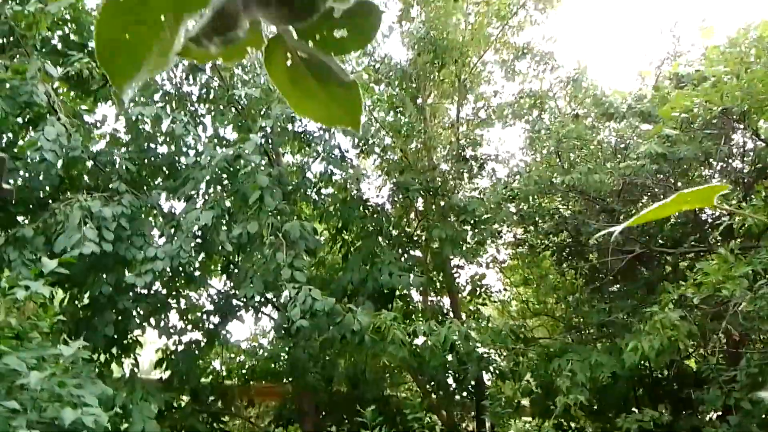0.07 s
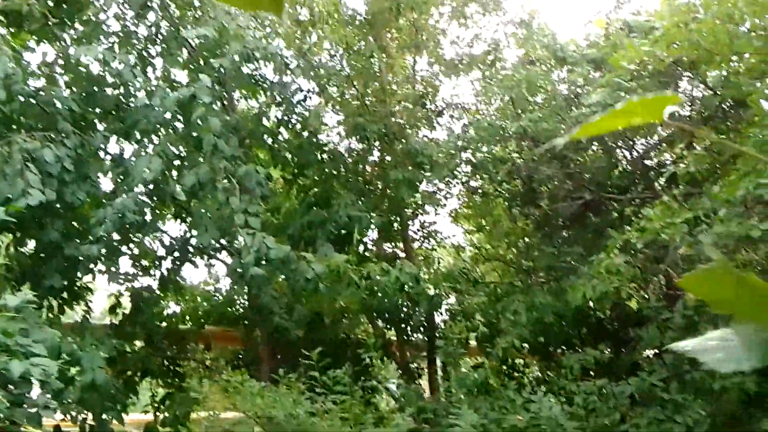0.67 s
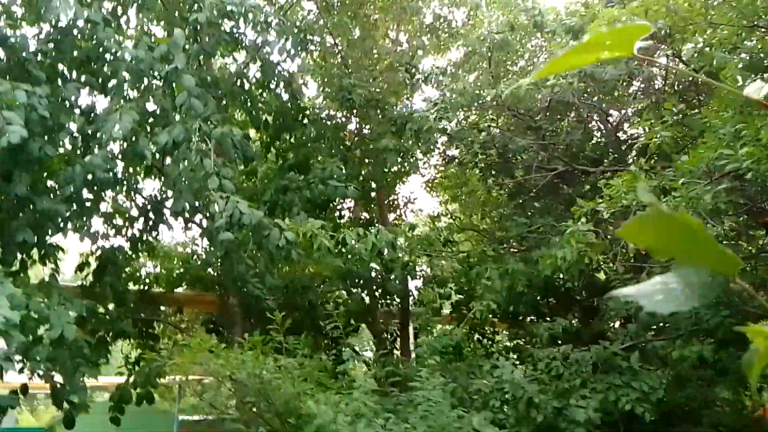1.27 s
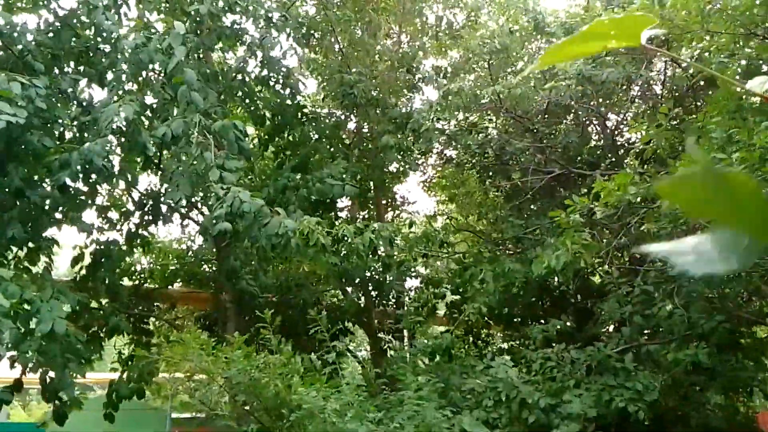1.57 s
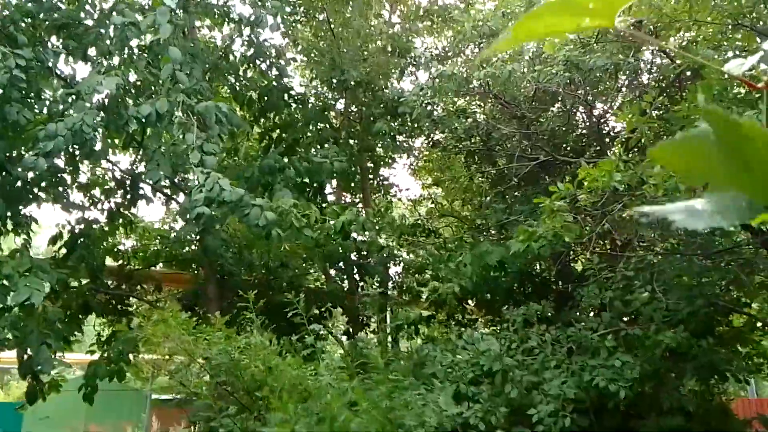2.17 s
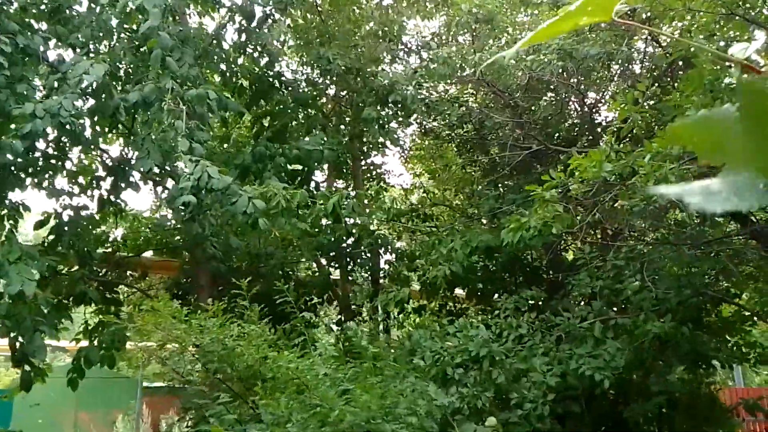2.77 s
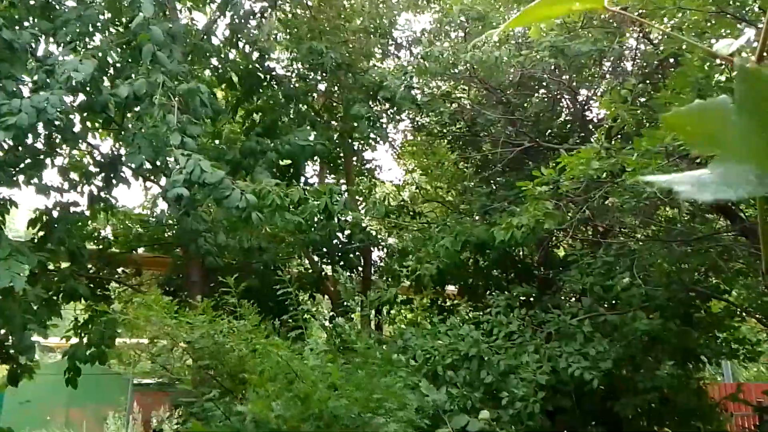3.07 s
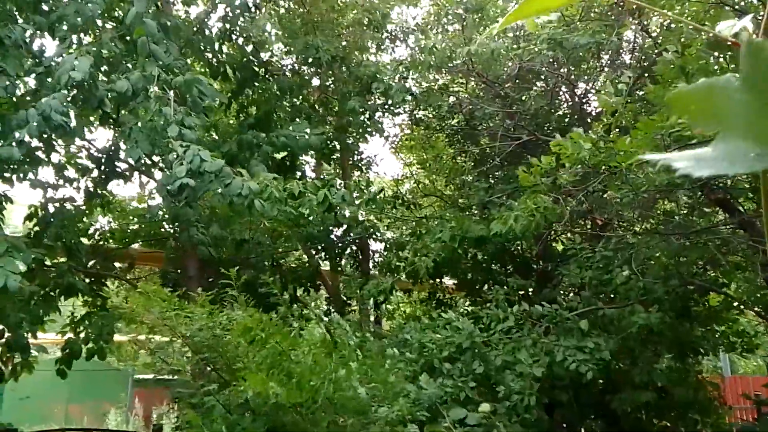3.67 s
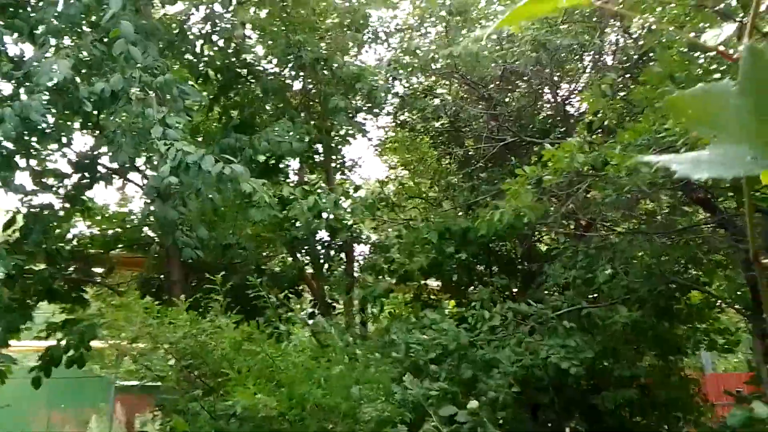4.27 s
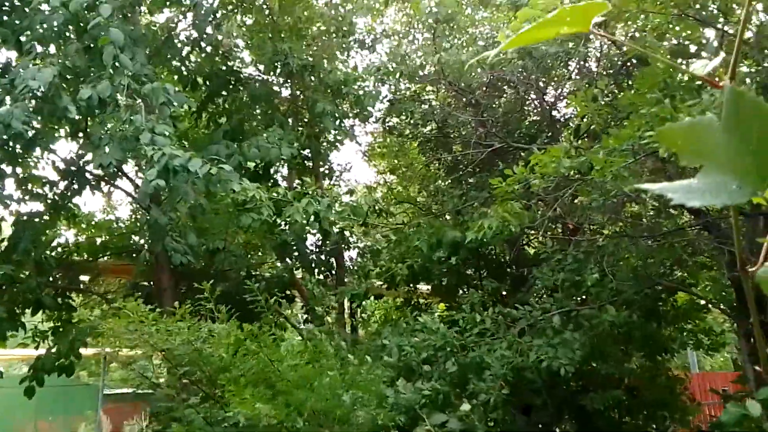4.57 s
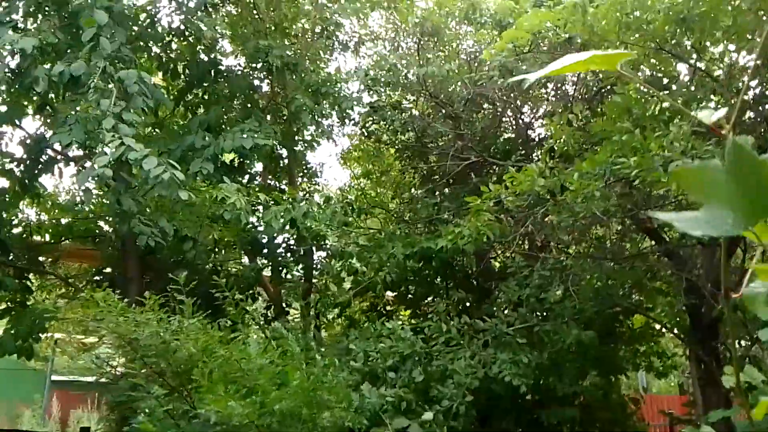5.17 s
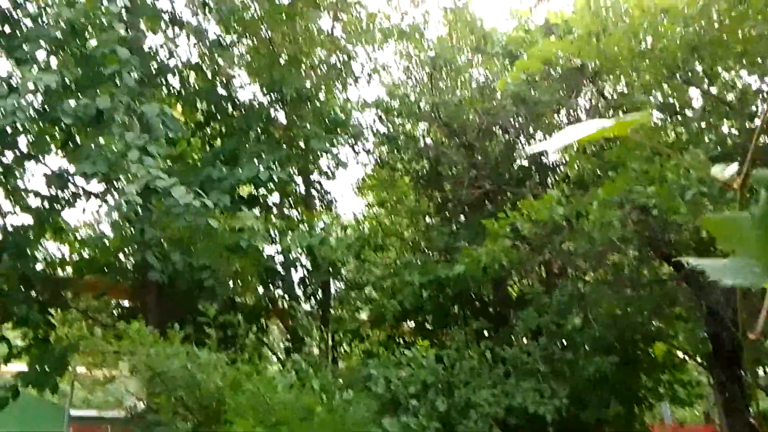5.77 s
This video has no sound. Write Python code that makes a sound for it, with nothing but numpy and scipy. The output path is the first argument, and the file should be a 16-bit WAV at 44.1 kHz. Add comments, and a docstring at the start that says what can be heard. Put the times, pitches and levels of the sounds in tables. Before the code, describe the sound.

Wind strikes the microphone almost at once in a garden, with low fluttering thumps and a rush that whistles very thinly at its height, while twigs tick lightly nearby. After about a second the buffeting fades. What remains is a faint, even hiss of leaves in trees and shrubs above a distant drone, with a far engine swelling twice, two slight puffs of wind and a faint deep rumble in the second half.

```python
"""A garden in a light breeze, heard from one microphone: far treetops and near leaves hiss over a faint
distant drone, and a twig taps close by now and then. Early on one gust reaches the microphone: eddies
thump on its port, and the flow rushes and whistles thinly at its height. It dies away and leaves the
steady hiss, with a far-off engine, two faint puffs of wind and a deep rumble that sets in past midway."""
import sys
import numpy as np
from scipy import signal
from scipy.fft import rfft, irfft, next_fast_len
from scipy.io import wavfile
from scipy.ndimage import uniform_filter1d

SR = 44100
rng = np.random.default_rng(int(sys.argv[2]) if len(sys.argv) > 2 else 0)


def store_pcm(level_fs):
    """Save levels as 16-bit WAV."""
    pcm = np.round(np.clip(level_fs, -1, 1) * 32767).astype(np.int16)
    wavfile.write(sys.argv[1], SR, np.atleast_2d(pcm).T)


N = 261513
TIME_S = np.arange(N) / SR


def from_db(db):
    """Decibels to gain."""
    return 10 ** (np.asarray(db) / 20)


def rms_one(x):
    """Scale to an rms of 1."""
    return x / np.sqrt(np.mean(x ** 2) + 1e-20)


def in_time(rows):
    """Each column of a curve at every sample."""
    time_s, *columns = np.transpose(rows)
    return [np.interp(TIME_S, time_s, column) for column in columns]


def swell(peak_s, half_width_s):
    """A smooth rise and fall of height 1."""
    return np.exp(-((TIME_S - peak_s) / half_width_s) ** 2)


def drift(rate_hz):
    """A slow random wander of spread 1, mostly below rate_hz."""
    step, settle = 40, 2000
    pole = np.exp(-2 * np.pi * rate_hz * step / SR)
    noise = rng.standard_normal(N // step + settle + 2)
    slow = signal.lfilter([1], [1, -2 * pole, pole * pole], noise)[settle:]
    return np.interp(np.arange(N) / step, np.arange(len(slow)), rms_one(slow))


def coloured(x, spectrum):
    """Shape a sound by rows of frequency_hz, relative_db; rms 1."""
    size = next_fast_len(N)
    hz, db = np.transpose(spectrum)
    bins_hz = np.maximum(np.arange(size // 2 + 1) * SR / size, 1)
    gain = from_db(np.interp(np.log(bins_hz), np.log(hz), db))
    return rms_one(irfft(rfft(x, size) * gain, size)[:N])


def resonate(x, hz, width_hz):
    """One resonance with gain 1 at its peak."""
    r = np.exp(-np.pi * width_hz / SR)
    feedback = [1, -2 * r * np.cos(2 * np.pi * hz / SR), r * r]
    return signal.lfilter(np.array([1, 0, -1]) * (1 - r * r) / 2, feedback, x)


def add(out, start_s, sound):
    """Mix a short sound in at start_s."""
    at = max(int(start_s * SR), 0)
    out[at:at + len(sound)] += sound[:N - at]


def turbulence(spectrum, even_s):
    """Flow noise whose rms is held near 1 over spans of even_s."""
    flow = coloured(rng.standard_normal(N), spectrum)
    span = int(even_s * SR)
    power = uniform_filter1d(uniform_filter1d(flow ** 2, span), span)
    return flow / np.sqrt(power + 1e-9)


# Treetops, far from the microphone: frequency_hz, relative_db
TREETOP_SPECTRUM = [(60, -23), (200, -13.5), (550, -4), (750, -7.5), (1100, -4), (1310, 0.5), (1520, -6),
                    (1800, -7.5), (2300, -13.5), (3000, -23), (4500, -60), (10000, -59)]
def treetops(level_db, sway_db=0.5):
    """Countless far leaves merge into a smooth hiss; two crowns sway, each on its own."""
    crowns = sum(rng.standard_normal(N) * from_db(sway_db * drift(3.2)) for _ in range(2))
    return from_db(level_db) * coloured(crowns, TREETOP_SPECTRUM)


# Leaves near the microphone: frequency_hz, relative_db
LEAF_SPECTRUM = [(300, -31.5), (1500, -9), (3200, -3), (4300, -1), (5500, -3.5), (6800, -6.5), (8300, -6),
                 (8900, -10), (9600, -18), (12000, -22.5), (16000, -26.5)]
def leaves(level_db, contacts_per_s=900, contact_db=-11, flutter_db=0.43):
    """Near leaves slide over each other in a soft hiss, dotted with tiny contacts."""
    touching = rng.random(N) < contacts_per_s * from_db(level_db - np.mean(level_db)) / SR
    sliding = rng.standard_normal(N)
    contacts = from_db(contact_db) * rms_one(touching * rng.standard_normal(N))
    return from_db(level_db + flutter_db * drift(19)) * coloured(sliding + contacts, LEAF_SPECTRUM)


# The breeze across the garden: time_s, far_relative_db, near_relative_db
BREEZE_CURVE = [(0, -66.5, -76.5), (0.9, -66.5, -77), (2.1, -66.5, -77.5), (3.2, -67.0, -78),
                (4.2, -66, -77), (4.9, -66.0, -77.5), (5.93, -66.5, -77)]
def breeze():
    """A nearly steady breeze stirs the far treetops and the near leaves."""
    far_db, near_db = in_time(BREEZE_CURVE)
    return treetops(far_db + 2.5) + leaves(near_db + 0.5)


# Thin hiss above the foliage: frequency_hz, relative_db
AIR_SPECTRUM = [(6000, -20), (9500, -7), (13000, -0.5), (14000, -1.5), (14800, 1.5), (15700, -1)]
def air(level_db=-90.5, flicker_db=1.5, fade_from_s=2.7, fade_db_per_s=2.0):
    """A slightly flickering hiss at the very top holds, then slowly thins out."""
    faded_db = fade_db_per_s * np.maximum(TIME_S - fade_from_s, 0)
    gain = from_db(level_db - faded_db + flicker_db * drift(6))
    return gain * coloured(rng.standard_normal(N), AIR_SPECTRUM)


# The surroundings, far beyond the garden: frequency_hz, relative_db
DRONE_SPECTRUM = [(20, -1), (45, -4.5), (70, 5), (105, -2), (140, -2), (190, -3.5), (260, 1.5), (330, 0.5),
                  (430, -16), (800, -39), (3000, -62)]
def drone(level_db=-70.36, suppression_db=-11, waver_db=0.56):
    """A steady low drone; the recorder's wind suppression briefly turns it down after the gust."""
    dip = swell(peak_s=1.45, half_width_s=0.24)
    gain = from_db(level_db + suppression_db * dip + waver_db * drift(3.3))
    return gain * coloured(rng.standard_normal(N), DRONE_SPECTRUM)


# Leaves and twigs tapping close to the microphone: time_s, peak_db, pitch_hz
TWIG_TAPS = [(0.106, -59, 2200), (0.560, -61.5, 2700), (0.948, -62, 2300), (2.465, -83, 14000),
             (4.272, -77, 11000), (4.866, -79, 12900)]
def taps(decay_s=0.0023, width_share=0.19):
    """Each tap is a short scratch ringing in a broad resonance."""
    out, t = np.zeros(N), np.arange(SR // 10) / SR
    for time_s, peak_db, pitch_hz in TWIG_TAPS:
        scratch = rng.standard_normal(len(t)) * t * np.exp(-t / decay_s)
        tap = resonate(scratch, pitch_hz, pitch_hz * width_share)
        add(out, time_s - decay_s, from_db(peak_db) * tap / np.max(np.abs(tap)))
    return out


# Strength of the slow eddies, right on the microphone: time_s, relative_db
GUST_CURVE = [(0.31, -76), (0.36, -49), (0.52, -52.5), (0.6, -36), (0.86, -30), (0.94, -37), (0.99, -52.5),
              (1.13, -49.5), (1.25, -63.5), (1.69, -58.5), (1.95, -92)]
# Their rumble on its port: frequency_hz, relative_db
EDDY_SPECTRUM = [(15, -8), (35, 7), (60, 5), (110, 7.5), (170, -2.5), (220, -5), (290, -24), (450, -57),
                 (1000, -83)]
def gust(trim_db=-0.5, flutter_db=1.5, flutter_hz=22, lump_db=1.5):
    """Slow eddies rumble on the port in uneven pulses; faster flow adds a rush that flutters with them."""
    gust_db, = in_time(GUST_CURVE)
    wake = wakes()
    eddies = turbulence(EDDY_SPECTRUM, even_s=0.029)
    fast_flow = from_db(lump_db * eddies) * rush(wake)
    pulses = from_db(gust_db + trim_db + flutter_db * drift(flutter_hz))
    return np.hypot(pulses, wake) * eddies + fast_flow


# Single strong eddies thumping on the microphone port: time_s, relative_peak_db, pitch_hz
PORT_THUMPS = [(0.378, -36.5, 140.8), (0.464, -37.5, 51.6), (0.551, -25, 92.4), (0.713, -21.5, 137),
               (0.737, -23, 165), (0.774, -22.5, 147), (0.804, -19.5, 182), (0.921, -33.5, 420),
               (0.942, -26, 110), (0.957, -29.5, 278), (1.092, -39, 88), (1.331, -43.5, 98),
               (1.415, -51, 85), (1.481, -37, 109), (1.603, -46, 70)]
def thumps(trim_db=-1.0, half_width_cycles=0.5):
    """An eddy crossing the port pushes, then pulls: one smooth swing of pressure."""
    out, t = np.zeros(N), np.arange(SR // 10) / SR
    middle_s = np.mean(t)
    for time_s, peak_db, pitch_hz in PORT_THUMPS:
        cycles = (t - middle_s) * pitch_hz
        swing = -np.sin(2 * np.pi * cycles) * np.exp(-(cycles / half_width_cycles) ** 2)
        add(out, time_s - middle_s, from_db(peak_db + trim_db) * swing / np.max(swing))
    return out


def wakes(relative_db=-10.5, rise_s=0.0055, decay_s=0.026):
    """Strength of the churning air around each thump: a quick rise, a slower decay."""
    strength = np.zeros(N)
    for time_s, peak_db, _ in PORT_THUMPS:
        falloff = np.maximum((time_s - TIME_S) / rise_s, (TIME_S - time_s) / decay_s)
        strength += from_db(peak_db + relative_db) * np.exp(-np.minimum(falloff, 20))
    return strength


# Fast flow through the microphone port: frequency_hz, relative_db
RUSH_SPECTRUM = [(100, -2.5), (200, 6.5), (300, 9.5), (360, 3.5), (420, 2.5), (520, -2), (610, 2),
                 (700, -10.5), (930, -5.5), (1090, -33), (1600, -48), (4000, -80)]
def rush(wake, level_db=-46.5, peak_s=0.86, rise_s=0.16, fall_s=0.25, wake_db=-19, top_boost_db=3):
    """Fast flow builds quickly and dies more slowly, brightest at its height; each wake adds a little."""
    flow = swell(peak_s, np.where(TIME_S < peak_s, rise_s, fall_s))
    noise = turbulence(RUSH_SPECTRUM, even_s=0.084)
    body = signal.sosfiltfilt(signal.butter(6, 750, fs=SR, output="sos"), noise)
    top = from_db(level_db + top_boost_db) * flow ** 2 * (noise - body)
    return np.hypot(from_db(level_db) * flow, from_db(wake_db) * wake) * body + top


# Whistles at the microphone port: peak_s, half_width_s, pitch_hz, width_hz, level_db
PORT_WHISTLES = [(0.91, .14, 3750, 170, -83.5), (0.96, 0.26, 8400, 340, -81), (1.08, .15, 11000, 140, -99),
                 (1.02, .22, 13300, 90, -93), (1.2, .16, 14800, 300, -96)]
def whistles():
    """The flow blows across small cavities of the port; each rings narrowly and fades."""
    out = np.zeros(N)
    for peak_s, half_width_s, pitch_hz, width_hz, level_db in PORT_WHISTLES:
        band = resonate(rng.standard_normal(N), pitch_hz, width_hz)
        tone = rms_one(resonate(band, pitch_hz, width_hz))
        out += from_db(level_db) * swell(peak_s, half_width_s) * tone
    return out


# An engine a long way off: peak_s, half_width_s, relative_db
FAR_ENGINE_SWELLS = [(2.3, 0.44, -75.5), (5.45, .28, -76.5)]
def engine(pitch_hz=145, waver_hz=1.38):
    """The wavering note of a distant engine swells and fades."""
    phase = 2 * np.pi * np.cumsum(pitch_hz + waver_hz * drift(2.9)) / SR
    gain = sum(from_db(db) * swell(peak_s, half_s) for peak_s, half_s, db in FAR_ENGINE_SWELLS)
    return gain * np.sqrt(2) * np.sin(phase)


# Faint, low puffs of wind on the microphone: peak_s, relative_db
LOW_WIND_PUFFS = [(2.55, -71.5), (4.13, -72)]
def puffs_and_rumble(rumble_db=-75, from_s=3.6, rise_s=0.25):
    """Wind puffs faintly on the microphone; a steady rumble in the same deep band sets in past midway."""
    band = rms_one(resonate(rng.standard_normal(N), hz=75.6, width_hz=19))
    set_in = 0.5 + 0.5 * np.tanh((TIME_S - from_s) / rise_s)
    puffs = sum(from_db(db) * swell(peak_s, half_width_s=0.064) for peak_s, db in LOW_WIND_PUFFS)
    return (from_db(rumble_db) * set_in + puffs) * band


def scene():
    """Foliage, far surroundings and the gust, all at one microphone."""
    foliage = breeze()
    low_end = from_db(-0.86) * (engine() + puffs_and_rumble()) + drone()
    wind_on_port = gust() + thumps() + whistles()
    return (foliage + low_end + wind_on_port + air() + taps())[None]


def record(dry):
    """The microphone's top end is cut steeply."""
    cutoff_hz = 15750
    return signal.sosfilt(signal.ellip(12, .1, 80, cutoff_hz, fs=SR, output="sos"), dry)


dry = scene()
out = record(dry)
store_pcm(out)
```